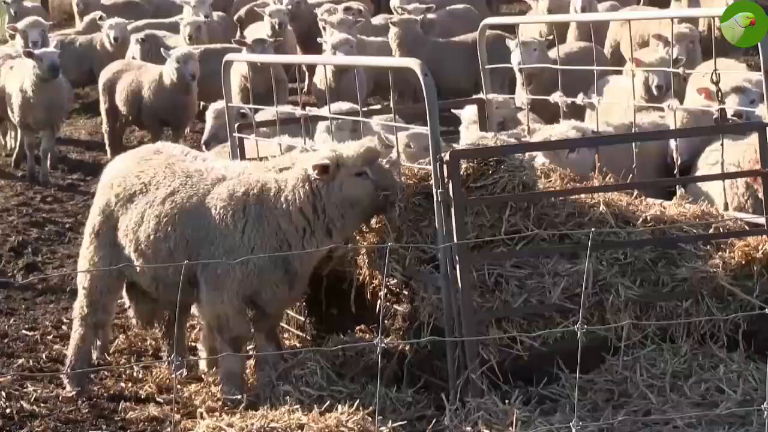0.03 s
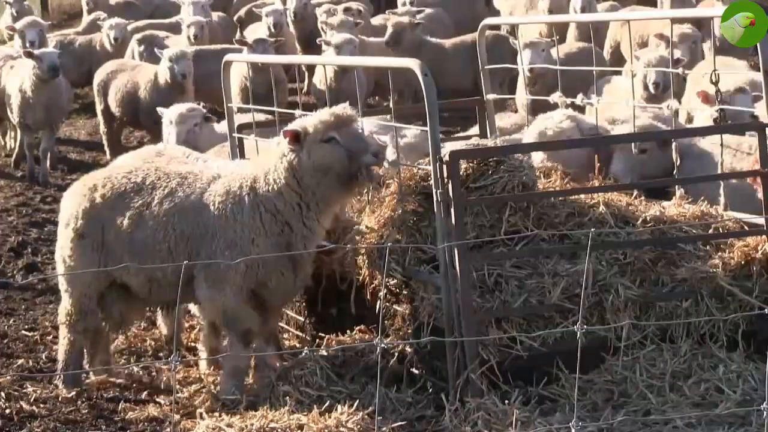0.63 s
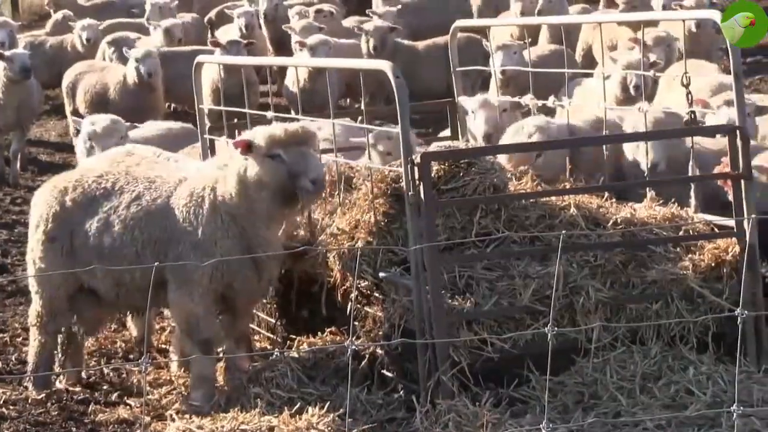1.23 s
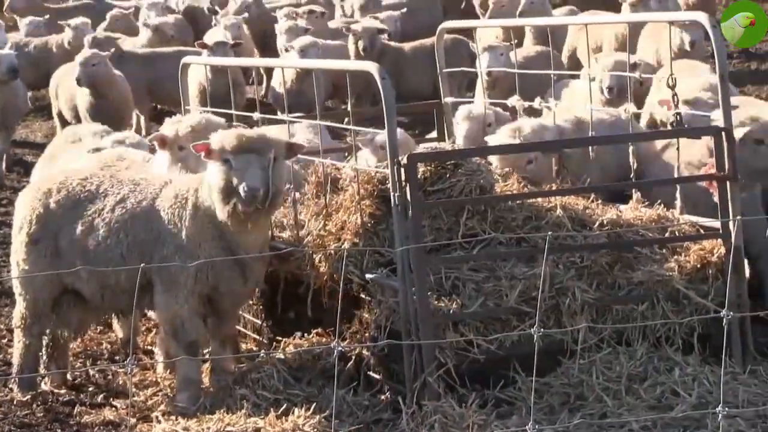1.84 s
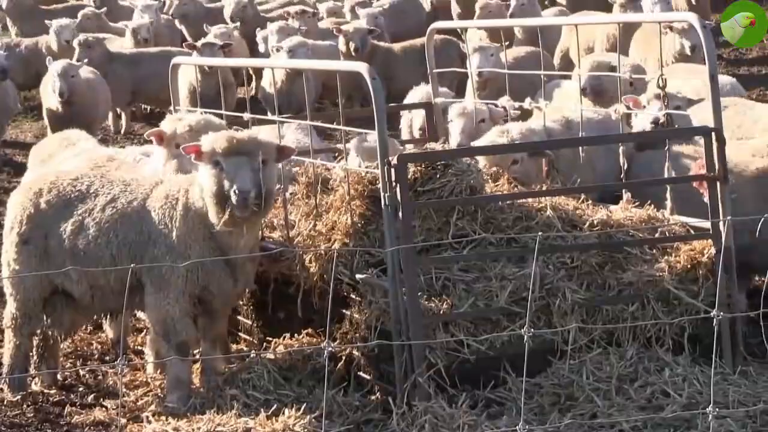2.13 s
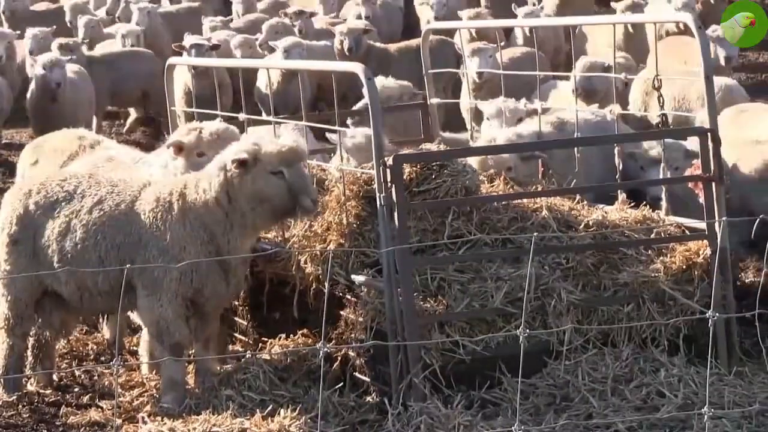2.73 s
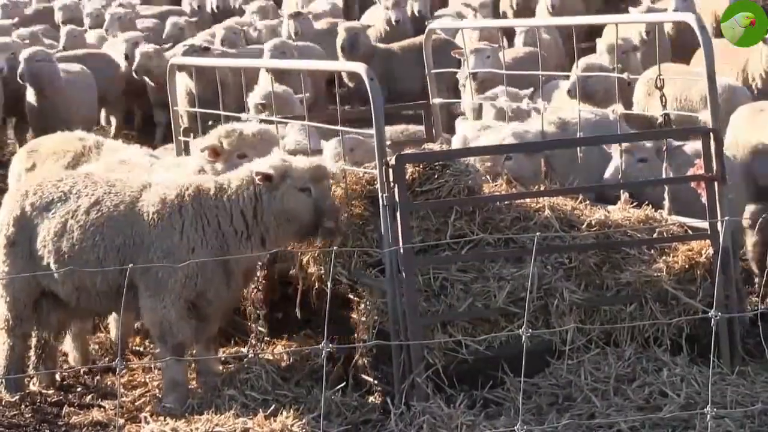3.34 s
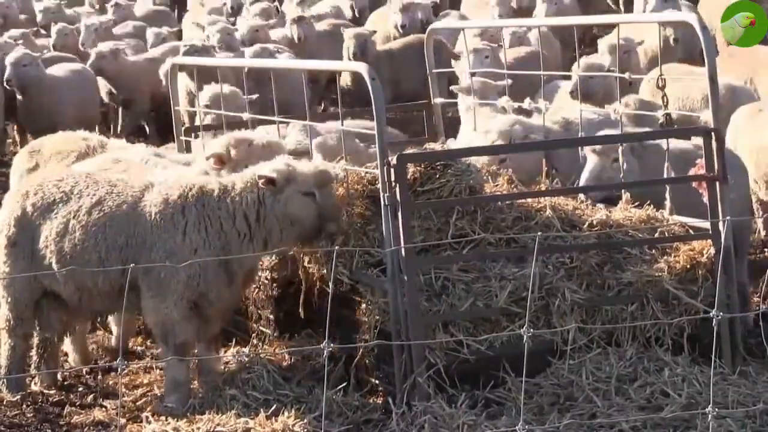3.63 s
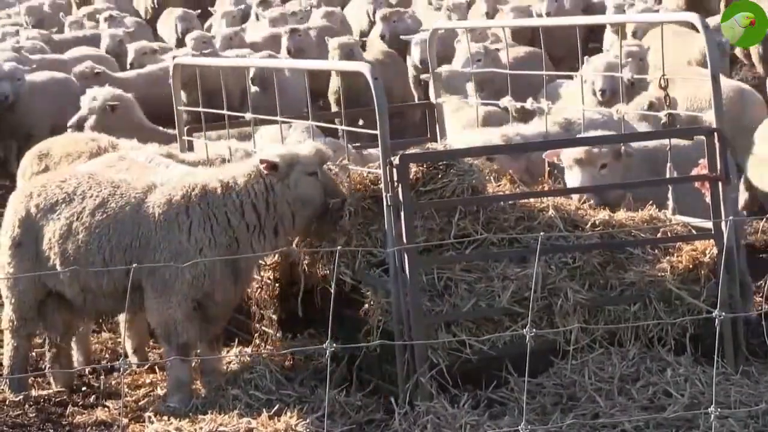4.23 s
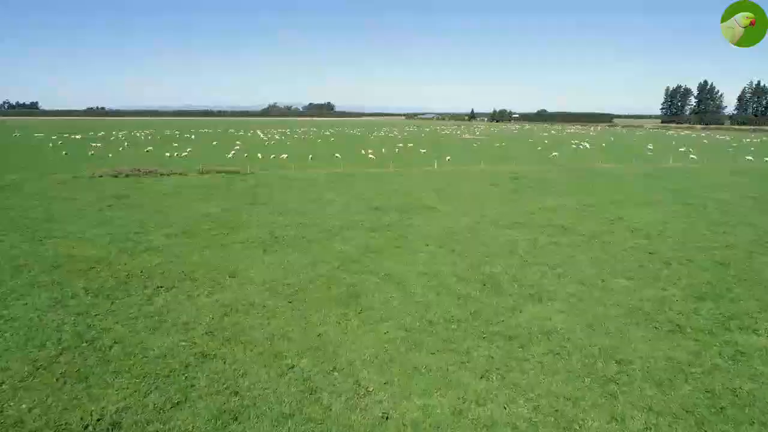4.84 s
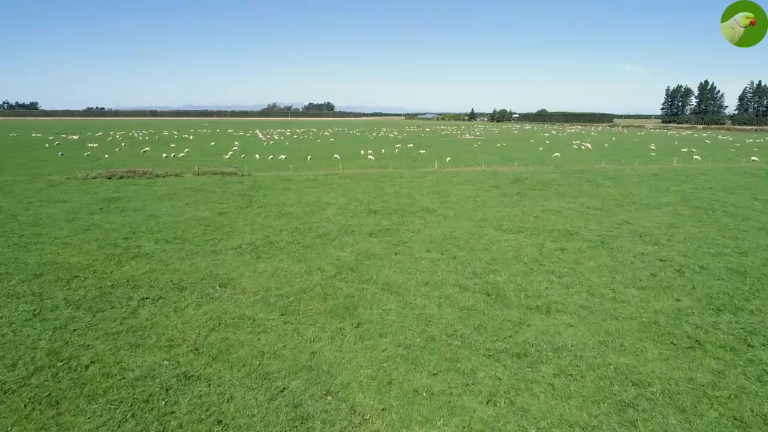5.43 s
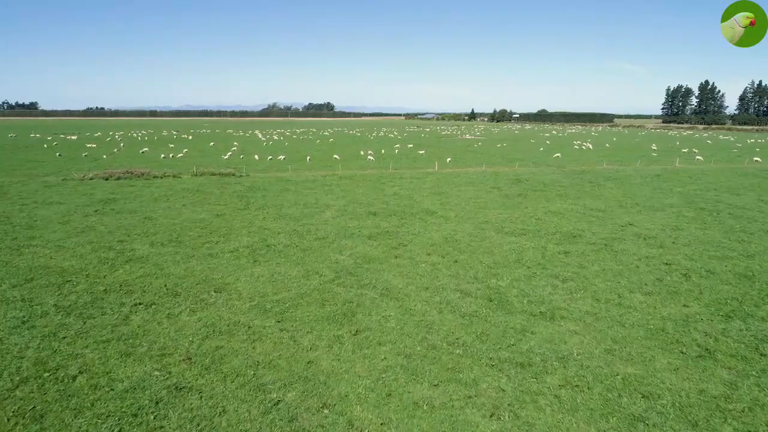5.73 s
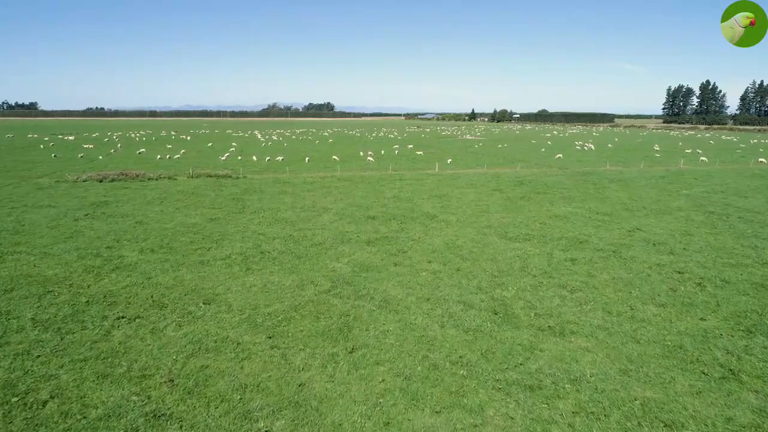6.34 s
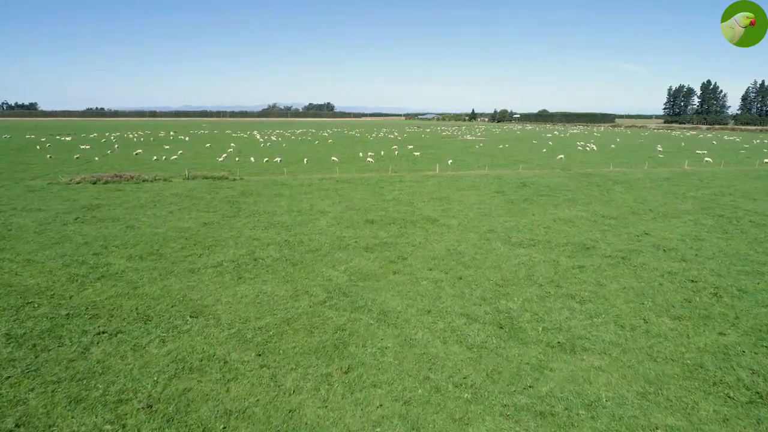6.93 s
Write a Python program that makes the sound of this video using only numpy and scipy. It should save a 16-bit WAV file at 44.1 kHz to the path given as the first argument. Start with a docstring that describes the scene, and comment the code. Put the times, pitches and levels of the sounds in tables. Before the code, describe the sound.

Overlapping sheep bleats in an open field, followed by one loud, close bleat, with quiet feeding and shuffling hooves underneath.

```python
"""Sheep in an open paddock

Three sheep bleat over one another some way off, then a fourth grunts and calls close by.
Each bleat is a train of vocal-fold pulses ringing a throat, throbbing about 13 times a second.
Underneath, in a light breeze, the flock tugs at dry feed and treads soft ground,
and a small bird twitters far away."""
import sys
import numpy as np
from scipy import signal
from scipy.fft import rfft, irfft
from scipy.io import wavfile
from scipy.ndimage import uniform_filter1d

SR = 44100
rng = np.random.default_rng(int(sys.argv[2]) if len(sys.argv) > 2 else 0)


def inscribe(sig):
    """Save sig as 16-bit PCM at rate SR to the path in sys.argv[1].

    A 1-D sig is mono; a 2-D sig holds one channel per row.
    Samples are clipped to [-1, 1] before scaling.
    """
    pcm = np.round(np.clip(np.atleast_2d(sig).T, -1, 1) * 32767)
    wavfile.write(sys.argv[1], SR, pcm.astype(np.int16))


N = 311787
TIME = np.arange(N) / SR

# Colours of the still air, rustling feed, a snapping stalk and the ground: f/Hz, level/dB
AIR_EQ = [(15, -41), (25, -15), (76, 3.5), (248, -1), (333, -1.5), (461, 1), (542, -6), (955, -10.5),
          (2150, -18), (5520, -19), (14600, -51), (15800, -31)]
STRAW_EQ = [(600, 5.5), (1500, -0.5), (4000, 4), (7000, 2), (11000, -1.5), (16000, -5)]
CRACK_EQ = [(600, -6.5), (2500, -2), (6000, 9), (12000, 5.5), (16000, 2.5)]
SOIL_EQ = [(40, -13), (130, -6.5), (230, 1.5), (400, -8), (800, -13), (1600, -22), (4000, -25)]
# Breeze on the microphone: t/s, level/dB
BREEZE_LEVEL = [(0, -75), (1, -75), (2, -66), (3.6, -75.5), (4.1, -83.5), (6, -72.5), (7.07, -76)]
# Contour of each call: t/s, level/dB, pitch/Hz, mouth opening (1 = wide), throb depth/dB
FIRST_CALL = [(0, -74, 223, 1, -3.5), (.045, -55.5, 231.7, 0.37, 10.5), (.115, -58.5, 243, 0.87, 9.5),
              (.18, -51, 257.7, 0.72, 6.5), (.26, -47.5, 257.1, 0.9, 11.5), (.33, -47.5, 256.1, 0.91, 10),
              (.57, -51, 248.9, 0.87, 11.5), (.65, -50.5, 249, 0.88, 6), (.76, -68, 238, 0.93, -1.5)]
DEEP_CALL = [(.83, -64, 100.6, 0.44, -1), (.955, -60, 125, 0.33, -0.5), (.97, -54, 139.6, 0.88, -1.5),
             (1.07, -52, 166.1, 0.98, 2), (1.085, -59, 169.4, 0.89, 1), (1.1, -57, 83.3, 0.95, 1.5),
             (1.23, -53, 81.04, 1, 0), (1.44, -55.5, 81.57, 1, -1), (1.53, -53.5, 77.5, .93, 3.5),
             (1.62, -54, 77.83, 0.98, 4), (1.69, -54, 79.74, 0.98, 0), (1.89, -60, 75.7, 0.83, 5),
             (1.96, -75, 68, 0.43, 4.5)]  # rises, then breaks to the octave below
HOARSE_CALL = [(1.72, -63, 163.7, 0.38, 1), (1.76, -53, 168.9, .86, 10.5), (1.84, -48, 170.2, 0.91, 9.5),
               (2.03, -47, 177.7, 0.99, 9), (2.38, -48.5, 175.1, 0.94, 9.5), (2.45, -50, 167.6, 0.98, 8),
               (2.53, -53.5, 168, 0.82, 7.5), (2.58, -57.5, 156.5, 0.92, 3.5), (2.63, -74.5, 145.4, 1, 0)]
GRUNT_CALL = [(5.128, -60, 195, 1, 0), (5.14, -56, 204, 0.93, 0), (5.175, -50.5, 233, 0.81, 0),
              (5.195, -60, 219, 0.58, 0)]  # the close sheep, just before it bleats
NEAR_CALL = [(5.218, -55, 233, 0.12, -1), (5.237, -41, 251, 0.63, 10), (5.256, -39, 260.3, 0.75, 17.5),
             (5.325, -32, 268.7, 0.97, 11.5), (5.39, -32.5, 296.7, .96, 8.5),
             (5.455, -34.5, 305.7, 0.95, 4.5), (5.52, -36.5, 313.5, 0.97, 5), (5.6, -35.5, 309.6, 1, 2),
             (5.66, -37.5, 309.3, 1, 3), (5.705, -39, 311.5, 0.88, 3), (5.77, -40, 304.5, 0.97, 4.5),
             (5.89, -42.5, 302.8, 1, 6), (5.965, -40.5, 288, 0.86, 4.5), (5.992, -47, 246, 0.93, 1.5),
             (6.02, -79.5, 209, 0.8, -5.5)]  # the mouth opens as the pitch scoops up
# Throat resonances: f/Hz, width/Hz, level at mid-call/dB, change/(dB per s)
FIRST_FORMANTS = [(724, 154, -5, 6), (545, 27, -11, -5), (254, 230, -24, -5), (1815, 163, -0.5, -2),
                  (3000, 230, -3, 7), (3630, 206, -0.5, -5), (4730, 1800, -16, 8), (5800, 630, -20, 17),
                  (7150, 1200, -27, 8), (10300, 1300, -27.5, 10)]
DEEP_FORMANTS = [(586, 65, 3, -0.5), (297, 135, -8, -4), (884, 67, -3.5, 8), (1120, 160, -3.5, -2),
                 (1303, 56, 0.5, 2), (1950, 318, -4.5, -4), (3570, 610, -18.5, -1)]
HOARSE_FORMANTS = [(694, 93, -4.5, 3), (226.3, 96, -15, 0), (1627, 116, 4, 2.5), (2100, 480, -11.5, -3),
                   (2530, 115, -4.5, 2), (2944, 110, -9.5, -11), (4120, 810, -14, 6), (5560, 660, -18.5, 1),
                   (8250, 1300, -36, -9)]
GRUNT_FORMANTS = [(243, 170, 0.5, -1), (480, 380, -19, -8), (1370, 170, -4.5, 3), (2270, 1300, -17, 2),
                  (4160, 940, -17.5, 0)]  # a shut-mouth colour
NEAR_FORMANTS = [(920, 130, 7.5, 1.5), (664, 140, -1, -3), (330, 34, -1, -9), (1460, 560, -9, 8),
                 (2006, 184, 4.5, -11.5), (2175, 73, 3, -3), (3130, 410, 3.5, 6), (3670, 410, -1, -9.5),
                 (4370, 450, -15.5, 34), (5400, 2350, -20, -2), (6900, 860, -18.5, 15), (8200, 740, -26, 6),
                 (11200, 1700, -39.5, -20)]
# Voice tilt: bright_db/(dB per octave) at full effort, tire_db_per_s (tilt lost each second),
# strain_db (tilt gained per octave of pitch)
FIRST_TILT = dict(bright_db=1.7, tire_db_per_s=2.5)
DEEP_TILT = dict(bright_db=3, tire_db_per_s=-4, strain_db=4)
HOARSE_TILT = dict(bright_db=1.1, tire_db_per_s=-0.5)
GRUNT_TILT = dict(bright_db=3, tire_db_per_s=9)
NEAR_TILT = dict(bright_db=6, tire_db_per_s=9)
# Throb: crests_s (t/s), pinch (higher = briefer catch between crests),
# sag_per_db (share of pitch lost per dB of catch; negative lifts it)
FIRST_RHYTHM = dict(crests_s=[-.03, .045, .108, .18, .25, .325, .403, .484, .562, .642, .72, .8],
                pinch=2.6, sag_per_db=.004)
DEEP_RHYTHM = dict(crests_s=np.arange(.8, 2.05, .083), pinch=2.8, sag_per_db=-0.11)
HOARSE_RHYTHM = dict(crests_s=[1.69, 1.76, 1.834, 1.908, 1.984, 2.056, 2.131, 2.208, 2.285, 2.364, 2.44, 2.518, 2.58, 2.66],
                 pinch=2.6, sag_per_db=.004)
NEAR_RHYTHM = dict(crests_s=[5.11, 5.18, 5.252, 5.323, 5.384, 5.454, 5.521, 5.57, 5.616, 5.661, 5.704, 5.769, 5.83, 5.892, 5.961, 6.03],
               pinch=2.9, sag_per_db=.01)
# How far a catch ducks each band of the voice: f/Hz, share of the throb depth
FIRST_DUCKING = [(400, 0.69), (900, 0.76), (1800, 1.15), (3300, 0.82), (6000, 0.38), (11000, 0.84)]
DEEP_DUCKING = [(500, 0.78), (2000, 0.56)]
HOARSE_DUCKING = [(700, 0.45), (1600, 1.09), (3000, 0.62), (6000, 0.26)]
NEAR_DUCKING = [(300, 0.75), (900, 0.93), (2000, 1.1), (3100, 1.18), (5000, 0.37), (11000, 1.3)]
# Decay of the scatter from flock and ground: f/Hz, t60/s
SCATTER_DECAY = [(200, 0.94), (900, 0.97), (1800, 0.75), (3500, 0.78), (8000, 1.05)]
# Tugs at the feed and scuffs on soft ground, timed at their peak: t/s, length/s, level/dB
FEED_TUGS = [(.03, 0.11, -66.5), (.26, .1, -81), (.57, 0.098, -62), (1.08, 0.45, -71), (1.29, 0.096, -64),
             (1.39, 0.038, -66), (1.65, 0.19, -74), (1.87, 0.28, -72), (2.18, 0.4, -68.5),
             (2.55, 0.29, -68), (2.78, 0.23, -67.5), (3, .1, -73.5), (3.22, 0.33, -72.5), (3.44, 0.18, -71),
             (3.69, 0.25, -68.5), (3.93, 0.062, -58.5), (4.24, 0.24, -72.5), (4.47, 0.19, -69),
             (4.65, 0.11, -75.5), (4.955, 0.055, -68), (6.22, 0.053, -73.5), (6.55, 0.083, -64),
             (6.62, 0.083, -67.5), (6.84, 0.22, -65.5), (7.06, 0.099, -63)]
HOOF_SCUFFS = [(2.8, 0.044, -63), (3.13, 0.084, -66), (3.35, 0.15, -62.5), (3.93, 0.14, -62.5),
               (4.24, 0.022, -62), (4.38, 0.029, -62), (4.48, 0.037, -60.5), (4.78, 0.024, -63),
               (4.88, 0.011, -59.5), (5.06, 0.8, -67), (6.3, 0.31, -74), (6.62, 0.12, -67.5),
               (6.73, 0.072, -66.5), (6.89, 0.2, -66)]
# Stalks snapping, and at 3.117 s the gritty tick of a hoof landing: t/s, level/dB, tilt/(dB per octave),
# decay/s
STALK_SNAPS = [(1.623, -49, .5, 0.0029), (1.673, -44.5, 2, 0.0024), (2.077, -42, -5.5, 0.0024),
               (2.677, -49, -6.5, 0.0029), (2.718, -54, -5, 0.0051), (2.809, -50, 1, 0.0022),
               (2.972, -40.5, 0, 0.0014), (3.117, -48.5, -14, 0.0037), (3.427, -53.5, -2, 0.0051),
               (3.466, -38.5, 4, 0.0024), (3.475, -41, 6, .002), (3.719, -52.5, 4, 0.0043),
               (3.791, -54, -3, 0.0027), (3.927, -48, 14, .003), (3.937, -46.5, -1.5, 0.0024),
               (3.983, -48, 1, 0.0024), (4.015, -56, -3, .003), (4.489, -53.5, -3, .003),
               (4.937, -52.5, 7, 0.016), (6.634, -48, -4, 0.0025)]
# Single steps: t/s, level/dB, f/Hz
HOOF_THUDS = [(0.235, -54.5, 150), (0.37, -59, 138), (0.615, -58, 102), (1.297, -57, 111),
              (1.396, -54.5, 81), (1.578, -59, 102), (1.882, -48, 109), (1.97, -61, 153), (2.102, -58, 141),
              (2.326, -58.5, 130), (2.603, -56.5, 121), (2.81, -56, 80.7), (3.117, -59, 122),
              (3.349, -57, 125), (3.619, -65, 110), (3.761, -71, 89.5), (3.943, -68, 215),
              (3.972, -59, 256), (6.203, -63, 172.3), (6.399, -62, 115), (6.705, -64, 186),
              (6.876, -55, 137)]
# Bird notes: t/s, length/s, start f/Hz, end f/Hz, level/dB, trill depth (share of the pitch)
BIRD_NOTES = [(0.621, 0.48, 7900, 7600, -77.5, 0.025), (1.023, 0.5, 7600, 7230, -77, .022),
              (2.638, 0.0085, 4690, 4960, -58, 0.012), (2.897, 0.12, 8500, 8340, -76, 0.064),
              (4.0, 0.24, 7700, 7680, -86, 0.026), (4.25, 0.23, 8000, 7800, -81, 0.022),
              (4.366, 0.042, 4170, 4650, -66, 0.063), (4.443, 0.039, 4720, 4100, -68, 0.13),
              (6.674, 0.18, 8200, 8160, -81, 0.025), (6.87, 0.22, 7940, 7560, -78, 0.032)]


def gain_of(db):
    """Decibels to amplitude."""
    return 10 ** (np.asarray(db) / 20)


def unit_rms(x):
    """Scales to rms 1."""
    return x / np.sqrt(np.mean(x ** 2) + 1e-20)


def curve_at(points, hz):
    """Reads a curve on a log-frequency axis."""
    f, value = np.transpose(points)
    return np.interp(np.log(hz + 1), np.log(f + 1), value)


def add(mix, start_s, sound):
    """Lays a sound into the mix."""
    part = mix[max(round(start_s * SR), 0):][:len(sound)]
    part += sound[:len(part)]


def equalise(x, eq):
    """Filters x by an EQ curve."""
    return irfft(rfft(x) * gain_of(curve_at(eq, np.fft.rfftfreq(len(x), 1 / SR))), len(x))


def noise(size, eq):
    """Coloured noise of rms 1."""
    return unit_rms(equalise(rng.standard_normal(size), eq))


def drift(size, rate_hz):
    """Smooth random modulation, rms about 1."""
    spectrum = rfft(rng.standard_normal(N)) * np.exp(-(np.fft.rfftfreq(N, 1 / SR) / rate_hz) ** 2)
    return unit_rms(irfft(spectrum, N))[:size]


def air(hush_db=-71, buffet_db=4):
    """A steady hush, and a light breeze whose eddies buffet the microphone."""
    hush = gain_of(hush_db) * noise(N, AIR_EQ)
    eddies = noise(N, [(20, -36), (60, -.5), (100, -1), (200, -8), (500, -23.5), (2000, -98)])
    gusts = unit_rms(eddies * gain_of(buffet_db * np.clip(drift(N, rate_hz=14), -2, 2)))
    return hush + gain_of(np.interp(TIME, *np.transpose(BREEZE_LEVEL))) * gusts


def brightness(age_s, level_db, pitch_hz, bright_db, tire_db_per_s, strain_db=0, tilt_per_db=.35):
    """Tilt of a voice in dB per octave: it brightens with effort and slides as the call goes on."""
    effort = tilt_per_db * (level_db - level_db.max()) + strain_db * np.log2(pitch_hz / pitch_hz.max())
    return bright_db + effort - tire_db_per_s * age_s


def throat(formants, hz, mouth, from_middle_s, skirt, nose_hz, shake_db):
    """Resonances for each pulse; a closing mouth lowers the first most, and opens the nose."""
    def peak(centre, width, db):
        """Power response of one resonance."""
        return gain_of(db) ** 2 / (1 + (2 * (hz - centre) / width) ** 2 / skirt) ** skirt

    def tremble():
        """Random wobble over a few pulses."""
        wobble = uniform_filter1d(uniform_filter1d(rng.standard_normal(512), 6), 5)
        return unit_rms(wobble)[:len(mouth), None]

    power = np.maximum(1 - mouth, 0) ** 4 * peak(nose_hz, width=125, db=12)
    first_hz = formants[0][0]
    for centre_hz, width_hz, db, db_per_s in formants:
        pull = min(first_hz / centre_hz, centre_hz / first_hz) ** 1.95
        # tongue and larynx shake, so the upper resonances wander in place and strength
        shake = shake_db * (1 - pull)
        moved_hz = centre_hz * (1 + .005 * shake * tremble()) * mouth ** pull
        level_db = db + db_per_s * from_middle_s + shake * tremble()
        power = power + mouth ** 2 * peak(moved_hz, width_hz, level_db)
    return np.sqrt(power)


def minimum_phase(gain):
    """Gives each row of gains the phase of a resonator, which rings only after it is struck."""
    log_gain = np.log(gain + 1e-5)
    mirrored = np.hstack([log_gain, log_gain[:, -2:0:-1]])
    return np.exp(np.conj(signal.hilbert(mirrored, axis=1)))[:, :gain.shape[1]]


def bleat(call, formants, tilt, ducking, crests_s, pinch, sag_per_db, nose_hz, jitter, shimmer_db,
          rasp, puff_s, skirt, grit, rough_per_db, shake_db, smear_s, jaw=0, size=2048):
    """Each snap of the vocal folds, with its puff of air, rings the throat; catches duck the voice."""
    knots_s, *controls = np.transpose(call)
    t = np.arange(knots_s[0], knots_s[-1], 1 / SR)
    level_db, pitch_hz, mouth, depth_db = (np.interp(t, knots_s, control) for control in controls)
    throbs = np.interp(t, crests_s, np.arange(len(crests_s)))
    catch = abs(np.sin(np.pi * throbs)) ** pinch  # 0 on a crest, 1 in the sharp dip between two
    slack_db = depth_db * catch
    # the jaw drops further on each strong crest, the more so as the call goes on
    late = np.linspace(0, 1, len(t)) ** 2
    mouth = mouth * (1 + jaw * late * np.tanh(depth_db / 4) * (1 - catch) ** 6)
    rough = np.clip((grit + rough_per_db * depth_db) * (1 + rasp * slack_db), grit, .95)
    fold_hz = pitch_hz * (1 - sag_per_db * slack_db) * (1 + jitter * rough * drift(len(t), 119))
    cycles = np.cumsum(fold_hz) / SR
    onsets = np.interp(np.arange(1, cycles[-1]), cycles, np.arange(len(t)))  # in samples
    at = onsets.astype(int)

    hz, age = np.fft.rfftfreq(size, 1 / SR), np.arange(size) / SR
    breath = rng.standard_normal((size // 4, size))[:len(at)]
    puff = breath * np.exp(-age / puff_s)
    puff = rfft(puff / np.linalg.norm(puff, axis=1, keepdims=True), axis=1)
    airy = np.clip(rough[at, None] * (hz / 2000) ** .6, 0, 1)  # turbulence takes over the highs
    # the voice finds many paths through the flock, so some partials come a little late
    lag_s = smear_s * drift(len(hz), 900) ** 2
    snap = np.exp(-2j * np.pi * np.cumsum(lag_s) * hz[1])
    source = np.sqrt(1 - airy ** 2) * snap + airy * puff

    slope_db = brightness(at / SR, level_db[at], pitch_hz[at], **tilt)
    tilt_db = slope_db[:, None] * np.log2(1 + (hz / 900) ** 2) / 2
    opening = np.clip(mouth[at], .1, 1.3)[:, None]
    from_middle_s = (t[at] - t.mean())[:, None]
    shape = throat(formants, hz, opening, from_middle_s, skirt, nose_hz, shake_db) * gain_of(tilt_db)
    shape /= np.linalg.norm(shape, axis=1, keepdims=True)
    shape *= gain_of(-slack_db[at, None] * curve_at(ducking, hz))
    throb_gain = np.linalg.norm(shape, axis=1)
    shape /= throb_gain[:, None]

    fine_delay = np.exp(-2j * np.pi * hz * (onsets - at)[:, None] / SR)
    pulses = irfft(source * minimum_phase(shape) * fine_delay, axis=1)
    voice = np.zeros(len(t))
    for start, pulse, force_db in zip(at, pulses, shimmer_db * rough[at] * breath[:, -1]):
        add(voice, start / SR, gain_of(force_db) * pulse)
    # level the pulse train, then ride it with the contour and the throb
    window = np.hanning(size)
    voice /= np.sqrt(abs(signal.fftconvolve(voice ** 2, window / window.sum(), "same")) + 1e-14)
    out = np.zeros(N)
    add(out, knots_s[0], voice * gain_of(level_db) * np.interp(t, t[at], throb_gain))
    return out


def outdoors(x, wet_db, echoes_per_s=4000, predelay_s=.003, early_s=.015):
    """The direct sound and a thin scatter from fleeces, rails and ground."""
    age = np.arange(SR) / SR
    taps = rng.choice([-1, 1], SR) * (rng.random(SR) < echoes_per_s / SR) * (age > predelay_s)
    hz, t, bands = signal.stft(taps, SR, nperseg=256)
    decay = gain_of(-60 * t / curve_at(SCATTER_DECAY, hz)[:, None])
    tail = signal.istft(bands * decay, SR)[1][:SR]
    tail *= 1 + 2 * np.exp(-age / early_s)
    tail /= np.sqrt(np.mean(abs(rfft(tail)[500:4000]) ** 2))  # unity gain in the mids
    return x + gain_of(wet_db) * signal.fftconvolve(x, tail)[:N]


def flock():
    """Three sheep some way off and one close by; the further the voice, the wetter it is."""
    first = bleat(FIRST_CALL, FIRST_FORMANTS, FIRST_TILT, FIRST_DUCKING, **FIRST_RHYTHM,
                  nose_hz=235, jitter=.03, shimmer_db=4, rasp=.12, puff_s=.003, skirt=1.6,
                  grit=.23, rough_per_db=.011, shake_db=1.6, smear_s=.0015)
    deep = bleat(DEEP_CALL, DEEP_FORMANTS, DEEP_TILT, DEEP_DUCKING, **DEEP_RHYTHM,
                 nose_hz=135, jitter=.045, shimmer_db=5, rasp=.1, puff_s=.014, skirt=1.6,
                 grit=.14, rough_per_db=.12, shake_db=1.6, smear_s=.004)
    hoarse = bleat(HOARSE_CALL, HOARSE_FORMANTS, HOARSE_TILT, HOARSE_DUCKING, **HOARSE_RHYTHM,
                   nose_hz=245, jitter=.05, shimmer_db=5, rasp=.15, puff_s=.003, skirt=1.5,
                   grit=.18, rough_per_db=.012, shake_db=1.8, smear_s=.0005)
    grunt = bleat(GRUNT_CALL, GRUNT_FORMANTS, GRUNT_TILT, NEAR_DUCKING, **NEAR_RHYTHM,
                  nose_hz=245, jitter=.1, shimmer_db=4, rasp=0, puff_s=.003, skirt=1.4,
                  grit=.45, rough_per_db=0, shake_db=2, smear_s=.001)
    near = bleat(NEAR_CALL, NEAR_FORMANTS, NEAR_TILT, NEAR_DUCKING, **NEAR_RHYTHM,
                 nose_hz=245, jitter=.04, shimmer_db=2.6, rasp=.45, puff_s=.0022, skirt=1.7,
                 grit=.07, rough_per_db=.011, shake_db=3.1, smear_s=.0004, jaw=.29)
    return (outdoors(deep, wet_db=-3) + outdoors(first + hoarse, wet_db=-7.5)
            + outdoors(grunt + near, wet_db=-12.5))


def stirring(strokes, rest_db, restless_db, edge_db=-9):
    """Envelope of strokes that swell and fade over the ceaseless stirring of the flock."""
    power = gain_of(rest_db + restless_db * drift(N, rate_hz=1.6)) ** 2
    for peak_s, length_s, db in strokes:
        away = abs(TIME - peak_s) / (length_s / 2)
        near = away < 3
        power[near] += gain_of(db + edge_db * away[near] ** 2.06) ** 2
    return np.sqrt(power)


def feed_rustle(grain_db=-.5, grains_per_s=4000):
    """Countless tiny fibres break as the sheep tug at dry feed."""
    breaks = (rng.random(N) < grains_per_s / SR) * rng.standard_normal(N)
    breaks *= gain_of(grain_db * np.minimum(rng.exponential(1, N), 4))
    return equalise(unit_rms(breaks) * stirring(FEED_TUGS, rest_db=-87, restless_db=6), STRAW_EQ)


def hooves(thud_trim_db=-1, rise_s=.011, scuff=.46, clods_db=3):
    """Feet shuffle unevenly over clods, and single steps give the soil a damped push."""
    clods = gain_of(clods_db * np.clip(drift(N, rate_hz=19), -2, 2))
    out = unit_rms(clods * noise(N, SOIL_EQ)) * stirring(HOOF_SCUFFS, rest_db=-73, restless_db=5.5)
    t = np.arange(SR // 6) / SR
    push = t / rise_s * np.exp(1 - t / rise_s)
    for start_s, db, hz in HOOF_THUDS:
        thud = np.sin(2 * np.pi * hz * t) + scuff * noise(len(t), SOIL_EQ)
        add(out, start_s, gain_of(db + thud_trim_db) * push * thud)
    return out


def bird():
    """Thin, distant gliding whistles and raspy chirps, broken up by a fast irregular trill."""
    out, flutter = np.zeros(N), drift(N, rate_hz=350)
    for start_s, length_s, start_hz, end_hz, db, trill in BIRD_NOTES:
        size = int(length_s * SR)
        warble = 1 + trill * np.roll(flutter, -int(start_s * SR))[:size]
        hz = np.linspace(start_hz, end_hz, size) * warble
        whistle = np.sqrt(2) * np.sin(2 * np.pi * np.cumsum(hz) / SR)
        add(out, start_s, gain_of(db) * signal.windows.tukey(size, .5) * whistle)
    flicker = unit_rms(1 + .6 * drift(N, rate_hz=60))
    return outdoors(out * flicker, wet_db=-7.5)


def stalk_snaps(trim_db=-5, crumble_db=-20, crumble_s=.056):
    """A stalk gives way, or a hoof lands with a gritty tick: a sharp crack, then a soft crumbling tail."""
    out, t = np.zeros(N), np.arange(SR // 10) / SR
    for start_s, db, tilt_db, crack_s in STALK_SNAPS:
        fall = np.exp(-t / crack_s) + gain_of(crumble_db) * np.exp(-t / crumble_s)
        eq = [(hz, level_db + tilt_db * np.log2(hz / 6000)) for hz, level_db in CRACK_EQ]
        add(out, start_s, gain_of(db + trim_db) * fall * noise(len(t), eq))
    return out


def scene():
    """The whole paddock in mono, bleats over a quiet bed."""
    return (flock() + air() + feed_rustle() + stalk_snaps() + hooves() + bird())[None]


def record(dry, cutoff_hz=15950):
    """A steep low-pass trims the very top."""
    lowpass = signal.firwin(511, cutoff_hz, window=("kaiser", 9), fs=SR)
    return signal.oaconvolve(dry, lowpass[None], "same")


dry = scene()
out = record(dry)
inscribe(out)
```